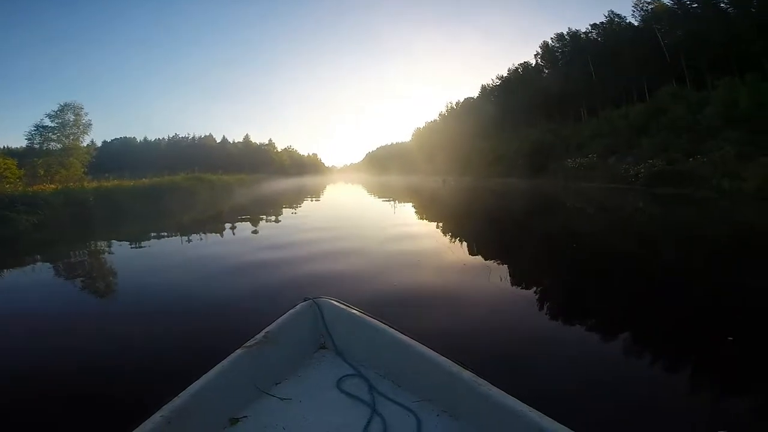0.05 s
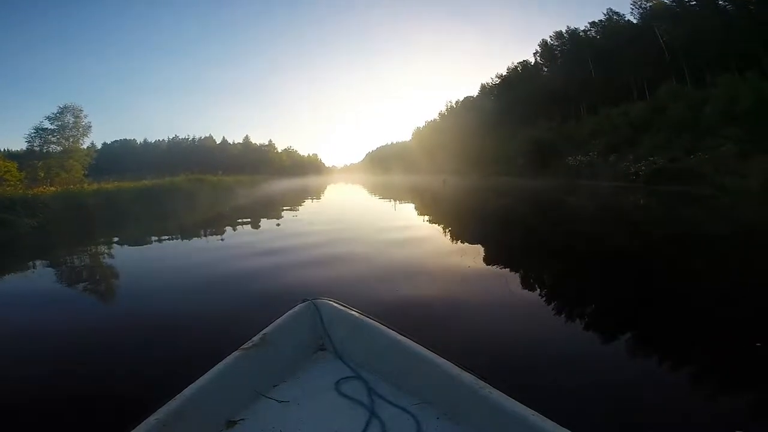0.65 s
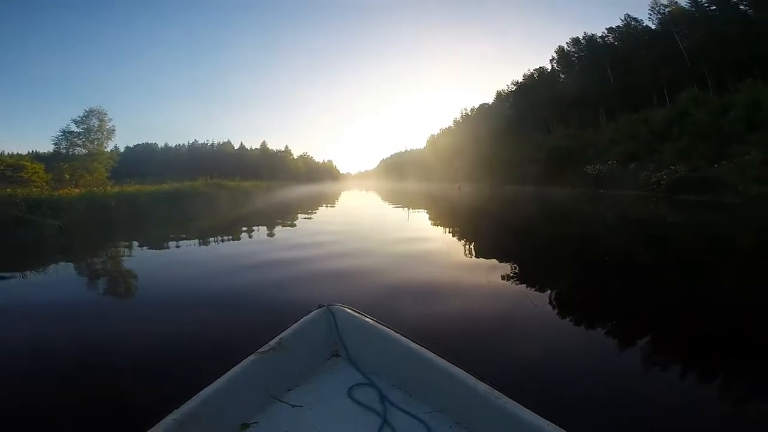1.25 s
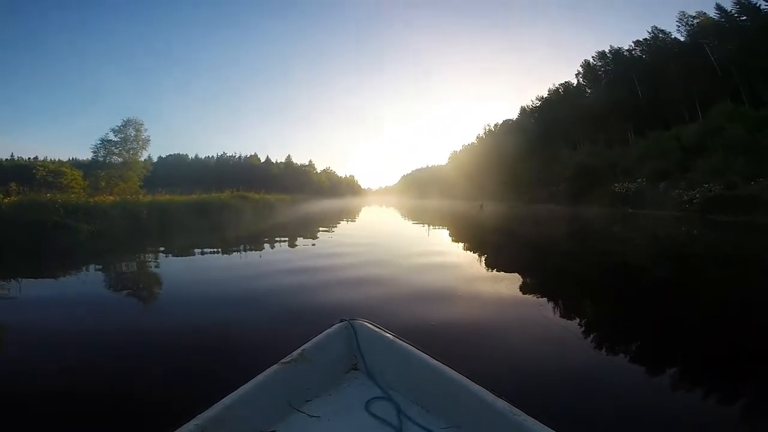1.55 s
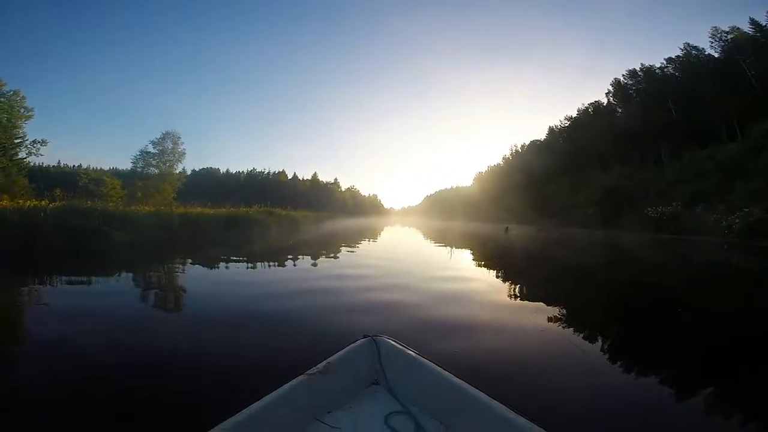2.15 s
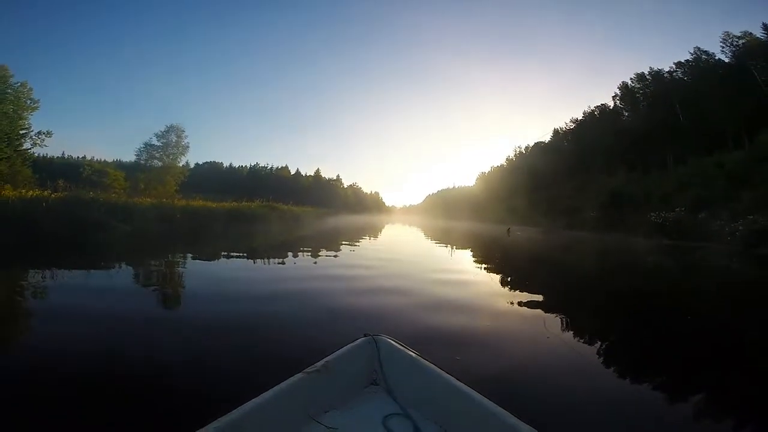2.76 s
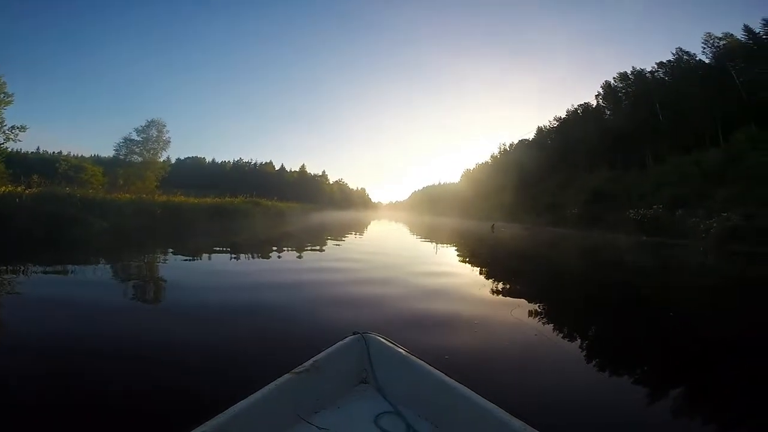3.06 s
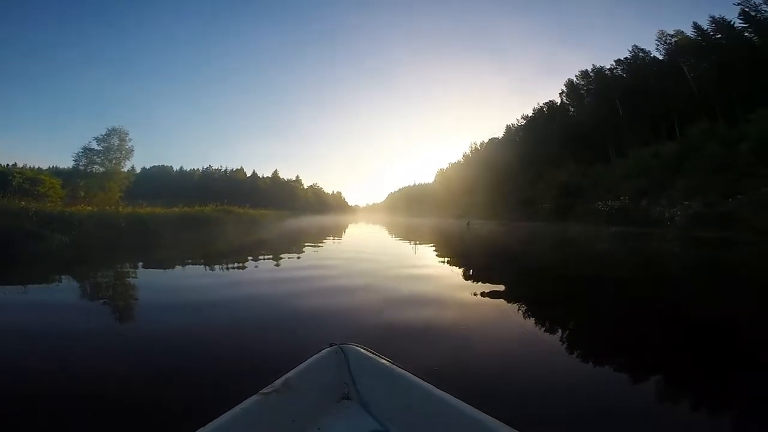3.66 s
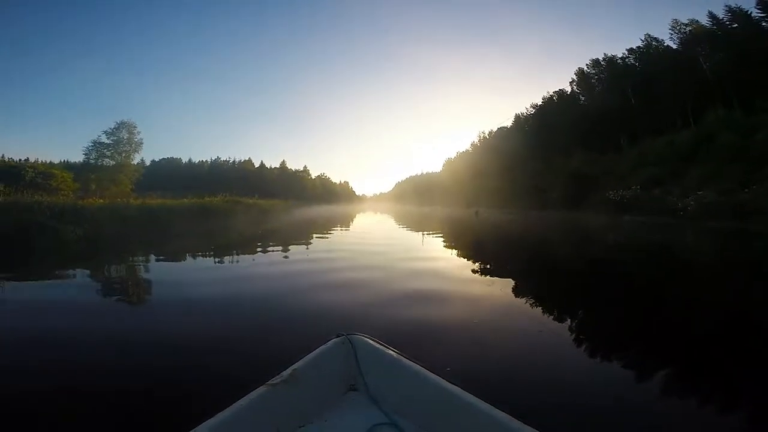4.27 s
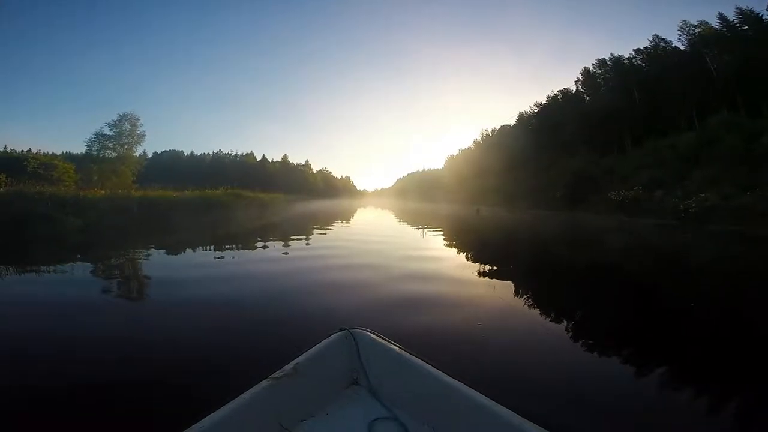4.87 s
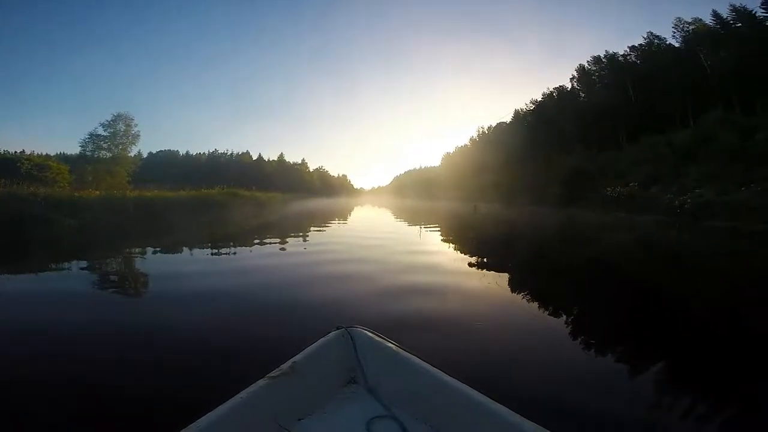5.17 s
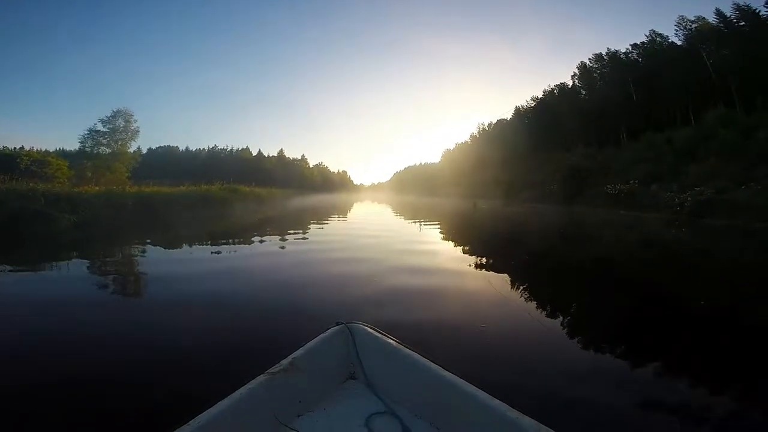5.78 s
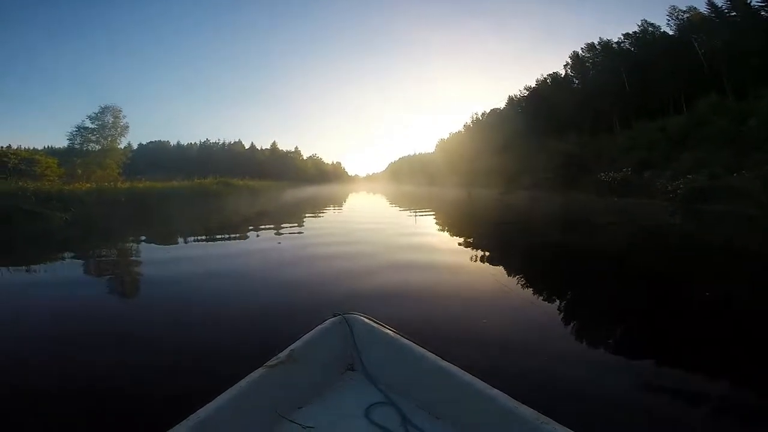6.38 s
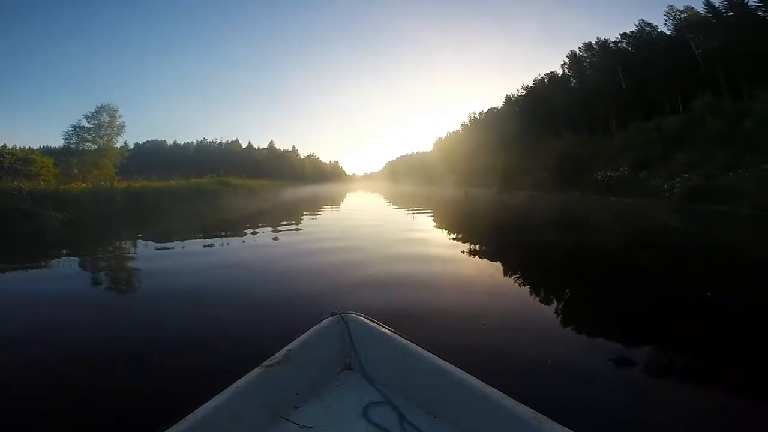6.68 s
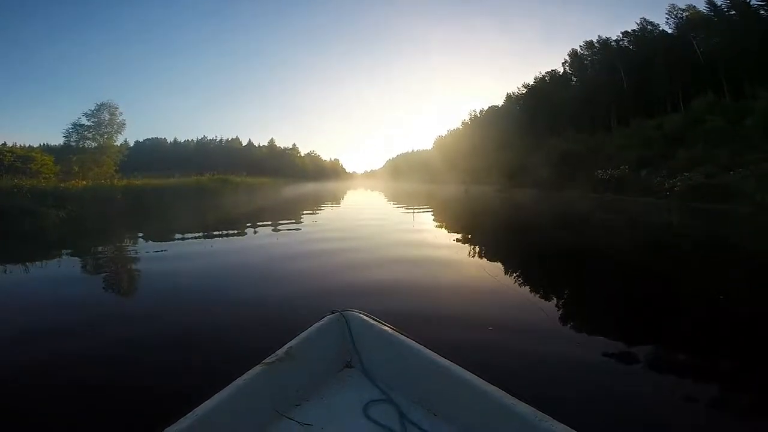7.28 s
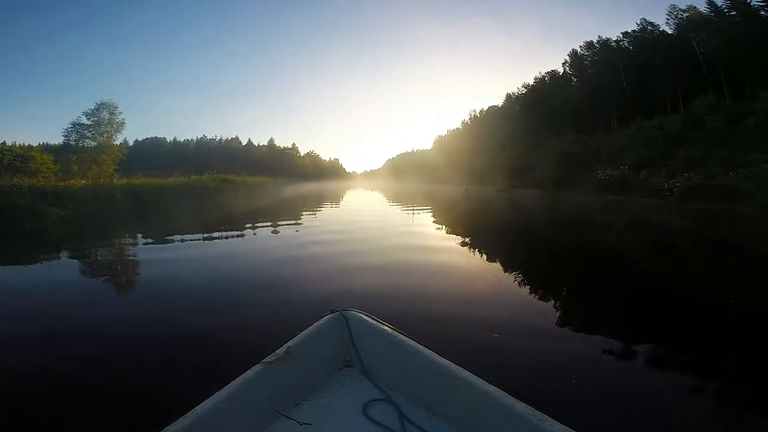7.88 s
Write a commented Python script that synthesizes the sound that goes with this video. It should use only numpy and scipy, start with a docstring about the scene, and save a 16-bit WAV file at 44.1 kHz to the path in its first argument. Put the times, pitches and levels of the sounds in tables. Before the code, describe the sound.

A rowboat drifts on a quiet river, heard from on board over a low, steady hiss. A hollow knock opens, followed by a quick clatter of bumps on the hull. Softer thuds come next, mixed with faint scraping on the boards and a rustle of clothing. The boat falls quiet for a few seconds, and finally distant birds give thin, brief chirps with a slight echo.

```python
"""Rowboat adrift on a calm river

Close by, oars and gear bump the hull of a small boat: its panels boom dully and hard edges tick.
Between bumps the rower moves, dragging wood over the boards, rustling clothes and rocking the hull.
Late on, birds whistle from the far bank. Still air and faint microphone hiss lie under it all."""
import sys
import numpy as np
from scipy import signal
from scipy.fft import rfft, irfft, next_fast_len
from scipy.io import wavfile

SR = 44100
rng = np.random.default_rng(int(sys.argv[2]) if len(sys.argv) > 2 else 0)


def store_pcm(level_fs):
    """Save levels as 16-bit WAV."""
    pcm = np.round(np.clip(level_fs, -1, 1) * 32767).astype(np.int16)
    wavfile.write(sys.argv[1], SR, np.atleast_2d(pcm).T)


N = 354123


def amp(db):
    """Decibels to gain."""
    return 10 ** (np.asarray(db) / 20)


def unit(x):
    """Scale to rms 1."""
    return x / np.sqrt(np.mean(x ** 2) + 1e-20)


def filtered(x, response):
    """Pass x through a response, given as a function of frequency in Hz."""
    size = next_fast_len(len(x) + 8192)
    return irfft(rfft(x, size) * response(np.fft.rfftfreq(size, 1 / SR)), size)[:len(x)]


def coloured(x, spectrum):
    """Shape x by (Hz, dB) points joined on a log frequency axis, and scale to rms 1."""
    hz, db = np.transpose(spectrum)
    return unit(filtered(x, lambda f: amp(np.interp(np.log(f + 1), np.log(hz + 1), db))))


def noise(spectrum):
    """Noise of rms 1 with a (Hz, dB) colour."""
    return coloured(rng.standard_normal(N), spectrum)


def band(centre_hz, half_width_hz, size=N):
    """Noise of rms 1 in one resonance."""
    white = rng.standard_normal(size)
    return unit(filtered(white, lambda f: 1 / (1 + ((f - centre_hz) / half_width_hz) ** 2)))


def add(track, start_s, sound):
    """Mix a sound into the track from start_s on."""
    start = max(round(start_s * SR), 0)
    track[start:start + len(sound)] += sound[:max(N - start, 0)]


def hull_ring(t, spot_hz, length, spot_db=6, spot_octaves=0.3, scatter_db=0.5, crowd_db=1.5):
    """The hull's panels ring after a blow; the spot struck lifts the modes near its own pitch."""
    # The strongest panel modes. Each row: frequency in Hz, relative level in dB, t60 in seconds.
    modes = [(77.4, -18, 0.72), (92.6, -6, 0.55), (118.14, -10.5, 0.7), (134.56, -4, 0.52),
             (170.8, -5, 0.34), (200.3, -7.5, 0.4), (237, -4.5, 0.29), (269.3, -2.5, 0.36),
             (349.6, -5, 0.26), (396.6, -3.5, 0.23), (456, -3.5, 0.18), (509.6, -6, 0.25), (556, -11, 0.19),
             (661, -5.5, 0.11), (782, -6.5, 0.13), (1280, -28, 0.082), (1530, -32, 0.21), (1748, -10, 0.13)]
    # The crowd of weaker modes. Each row: band centre in Hz, relative level in dB, t60 in seconds.
    crowd_bands = [(45, -23, 1), (79, -13, 0.84), (141, -9, 0.49), (268, -6.5, .33), (425, -8, 0.25),
                   (690, -3.5, 0.13), (864, -16, 0.18), (1070, -15.5, .13), (1560, -14, 0.036),
                   (2600, -16, 0.15), (5070, -14, 0.15)]
    lift_db = lambda hz: spot_db * np.exp(-(np.log2(hz / spot_hz) / spot_octaves) ** 2)
    ring = np.zeros(len(t))
    for hz, db, t60 in modes:
        strength = rng.choice([-1, 1]) * amp(db + lift_db(hz) + scatter_db * rng.standard_normal())
        ring += strength * amp(-60 * t / (t60 * length)) * np.sin(2 * np.pi * hz * t)
    # the weaker modes merge into noise whose low bands last longest
    f = np.fft.rfftfreq(len(t), 1 / SR) + 1
    phases = np.exp(2j * np.pi * rng.random(len(f)))
    centres = np.log([row[0] for row in crowd_bands])
    edges = np.r_[centres[0] - 1, centres, centres[-1] + 1]
    for k, (hz, db, t60) in enumerate(crowd_bands):
        triangle = np.interp(np.log(f), edges[k:k + 3], [0, 1, 0])
        crowd = unit(irfft(phases * triangle, len(t)))
        ring += crowd * amp(crowd_db + db + lift_db(hz) - 60 * t / (t60 * length))
    return ring


def knocks(lowest_hz):
    """Oars and gear bump the hull; a softer contact lasts longer and stirs only the low modes."""
    # Each row: start in seconds, relative level in dB, contact corner in Hz (soft is low),
    # pitch the struck spot favours in Hz, ring length as a multiple of the hull's own.
    blows = [(0.0, -23.5, 820, 407, 0.84), (0.009, -24.5, 506, 247, 1.12), (0.012, -33, 160, 84.5, 1.7),
             (0.868, -31, 760, 620, .8), (0.873, -23.5, 735, 286, 1.05), (0.892, -28.5, 676, 500, 1.35),
             (0.903, -28, 240, 145, 1), (1.038, -36, 510, 490, 1.08), (1.068, -33.5, 259, 261, 1.1),
             (2.116, -39.5, 960, 228, 0.26), (2.212, -52.5, 900, 490, 1.2), (2.563, -53, 700, 420, 0.57),
             (2.755, -33, 483, 112, 0.92), (2.781, -39, 450, 336, 1.13), (2.88, -36, 159, 109, 0.93),
             (3.337, -43, 800, 450, 0.85), (3.371, -31.5, 220, 115, 0.93), (3.402, -26, 140, 201, 0.79),
             (3.603, -54, 596, 500, 0.51)]
    out, t = np.zeros(N), np.arange(SR) / SR
    for start_s, db, corner_hz, spot_hz, length in blows:
        ring = hull_ring(t, spot_hz, length)
        softened = filtered(ring, lambda f: 1 / (1 + 1j * f / corner_hz) ** 2)
        add(out, start_s, amp(db - 1) * softened)
    # so small a hull radiates little deep bass
    return signal.sosfilt(signal.butter(2, lowest_hz, "highpass", fs=SR, output="sos"), out)


def ticks():
    """Hard edges touch with a tiny bright snap."""
    # Each row: start in seconds, level in dB, centre in Hz, half-width in Hz, t60 in seconds.
    contacts = [(0.001, -37.5, 1450, 303, 0.063), (0.002, -42, 3800, 3020, 0.036),
                (0.872, -48.5, 7800, 1800, 0.0069), (0.875, -50, 4340, 905, 0.02),
                (0.894, -61, 8000, 1700, .016), (1.666, -49, 8600, 1400, 0.0077),
                (2.839, -50, 12500, 2200, .005)]
    out, t = np.zeros(N), np.arange(SR // 10) / SR
    for start_s, db, hz, half_width_hz, t60 in contacts:
        add(out, start_s, amp(db - 60 * t / t60) * band(hz, half_width_hz, size=len(t)))
    return out


def air(hiss_db, whine_hz, whine_db):
    """Still morning air and microphone hiss, with a thin high band in it."""
    # The colour of the background. Each row: frequency in Hz, relative level in dB.
    hiss = [(12, -30), (20, -1.5), (42, 1), (128, -4), (184, -3.5), (217, -6), (321, -7.5), (389, -9.5),
            (590, -11), (972, -14), (1180, -15), (5140, -25), (8470, -32), (10300, -35), (15200, -41)]
    return amp(hiss_db) * noise(hiss) + amp(whine_db) * band(whine_hz, half_width_hz=280)


def effort(peak_s, length_s, rise_share=0.44, edge_db=6, flatness=2.2):
    """Gain of one movement: it gathers speed, peaks and eases off, edge_db down at either end."""
    t = np.arange(N) / SR - peak_s
    side_s = length_s * np.where(t < 0, rise_share, 1 - rise_share)
    return amp(-edge_db * (np.abs(t) / side_s) ** flatness)


def movements():
    """The rower moves: gains of sliding, rustle and rocking, with overlaps adding in power."""
    # Each row: peak time and length in seconds, then relative sliding, rustle and rocking levels in dB.
    moves = [(1.94, 0.17, -59, -68, -54.5), (2.212, .3, -55, -72.5, -58), (2.495, 0.24, -58, -75, -58.5),
             (2.863, 0.42, -60.5, -70, -50), (3.298, 0.45, -60, -69, -58), (3.63, 0.33, -65, -75.5, -60.5)]
    power = sum(np.outer(amp(dbs), effort(peak_s, length_s)) ** 2 for peak_s, length_s, *dbs in moves)
    return np.sqrt(power)


def rocking(gain, boom_hz):
    """Shifting weight stirs the hull's lowest modes."""
    return gain * band(boom_hz, half_width_hz=48)


def sliding(gain, catches_per_s, catch_db):
    """Wood drags over the boards in many small catches."""
    # The colour of the boards. Each row: frequency in Hz, relative level in dB.
    boards = [(30, -24), (75, -8), (160, -5), (280, -5), (400, 1.5), (495, 1), (620, -5.5), (800, -5),
              (1300, -16.5), (3000, -26.5), (8000, -46)]
    catches = (rng.random(N) < catches_per_s / SR) * rng.standard_normal(N)
    scrape = noise(boards) + amp(catch_db) * coloured(catches, boards)
    return gain * unit(scrape)


def rustling(gain):
    """The rower's clothing rustles with each movement."""
    # The colour of the cloth. Each row: frequency in Hz, relative level in dB.
    cloth = [(500, -13), (2000, 3.5), (6000, -5), (9500, -5.5), (13000, -10.5), (15500, -19)]
    return gain * noise(cloth)


def birds(arch_hz, echo_db, echo_t60):
    """Short gliding whistles from far off, some rough, smeared by the trees on the bank."""
    # Each row: start and length in seconds, first and last pitch in Hz, level in dB, waver in Hz.
    notes = [(6.68, 0.037, 4300, 4240, -61.5, 140), (7.028, .025, 3030, 2900, -65, 60),
             (7.265, 0.093, 3890, 3680, -59.5, 25), (7.533, .025, 5500, 5000, -68, 200),
             (7.715, .035, 5300, 5300, -72, 150), (7.765, .035, 2750, 3300, -63.5, 25),
             (7.857, .052, 4620, 3200, -62, 280), (7.912, 0.02, 2880, 2880, -56.5, 40),
             (7.942, 0.014, 2760, 2770, -52, 30)]
    calls = np.zeros(N)
    for start_s, length_s, first_hz, last_hz, db, waver_hz in notes:
        progress = np.linspace(0, 1, int(length_s * SR))
        arch = np.abs(np.sin(np.pi * progress))  # pitch and level bow upward in mid-note
        glide = first_hz + (last_hz - first_hz) * progress + arch_hz * arch
        pitch = glide + waver_hz * band(140, 120, size=len(progress))
        whistle = np.sin(2 * np.pi * np.cumsum(pitch) / SR)
        add(calls, start_s, amp(db) * np.sqrt(arch) * whistle)
    t = np.arange(SR) / SR
    trees = rng.standard_normal(SR) * amp(-60 * t / echo_t60)
    echo = signal.fftconvolve(calls, trees / np.linalg.norm(trees))[:N]
    return calls + amp(echo_db) * echo


def scene():
    """The near boat, the far bank and the air, at one microphone."""
    slide, rustle, weight = movements()
    boat = knocks(lowest_hz=47.7) + ticks() + rocking(weight, boom_hz=82)
    boat += sliding(amp(0.5) * slide, catches_per_s=79, catch_db=-2.5)
    boat += rustling(amp(1.5) * rustle)
    bank = birds(arch_hz=70, echo_db=-7, echo_t60=0.56)
    return (boat + bank + air(hiss_db=-58, whine_hz=10150, whine_db=-84))[None]


def record(dry):
    """One channel, with the highest treble cut off."""
    top_hz = 15300
    return filtered(dry[0], lambda f: f < top_hz)[None]


dry = scene()
out = record(dry)
store_pcm(out)
```